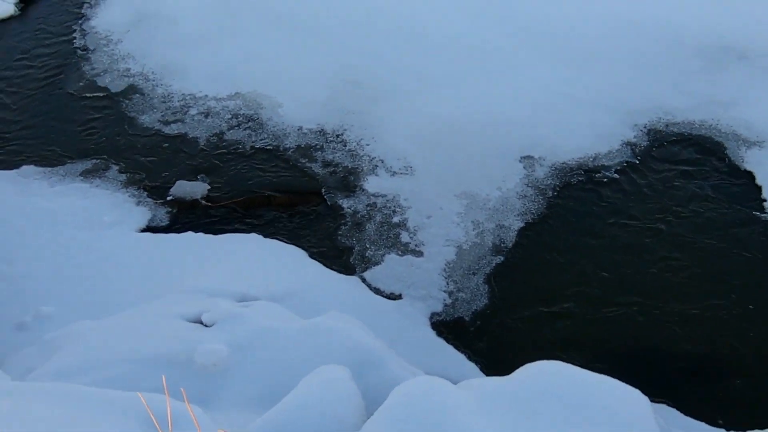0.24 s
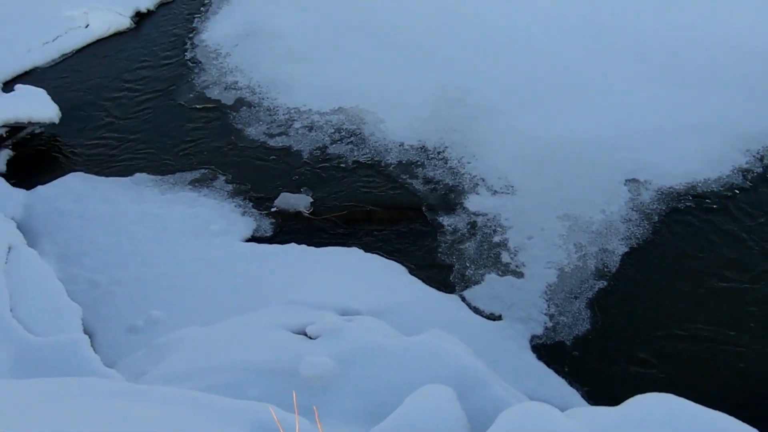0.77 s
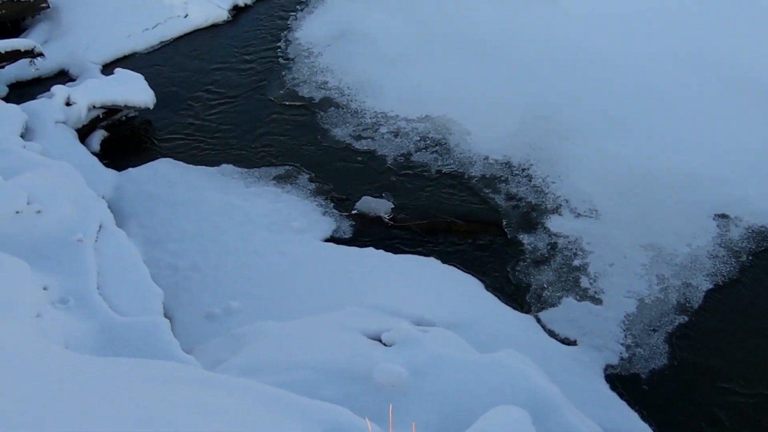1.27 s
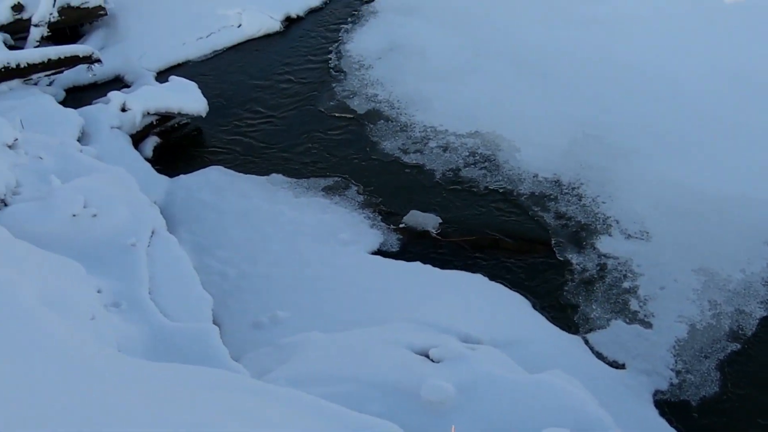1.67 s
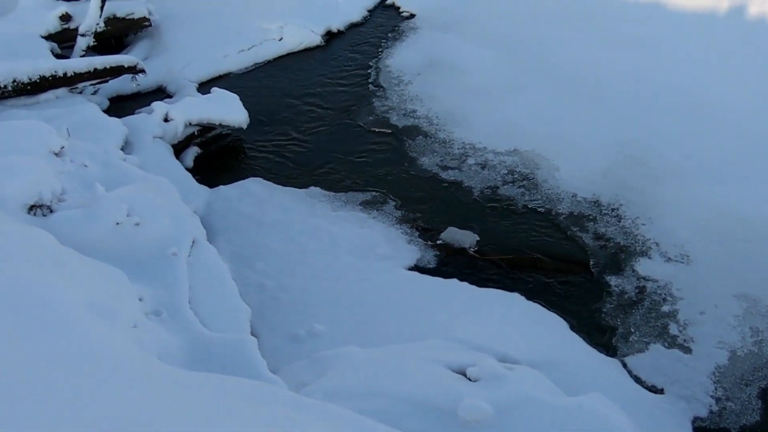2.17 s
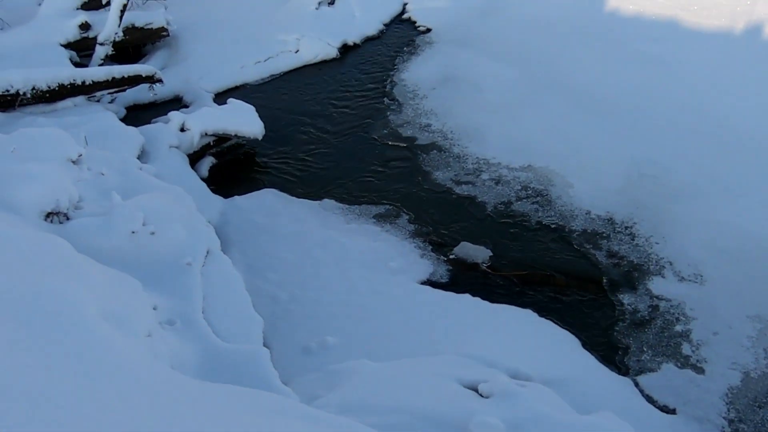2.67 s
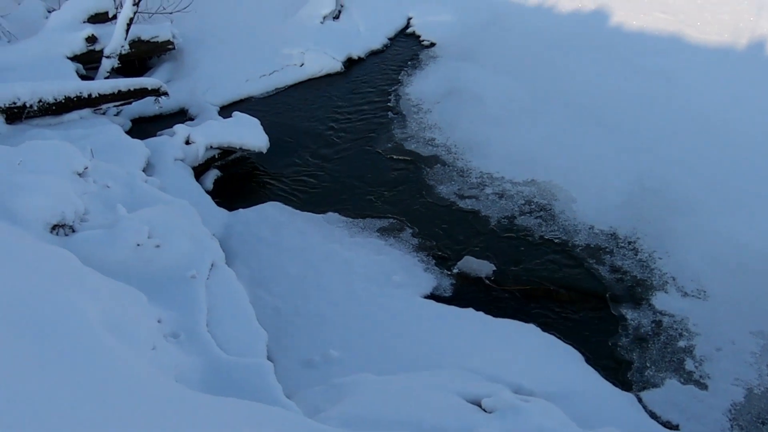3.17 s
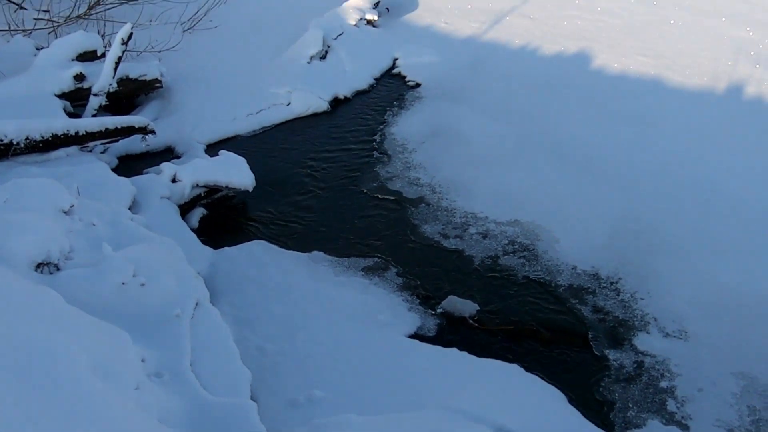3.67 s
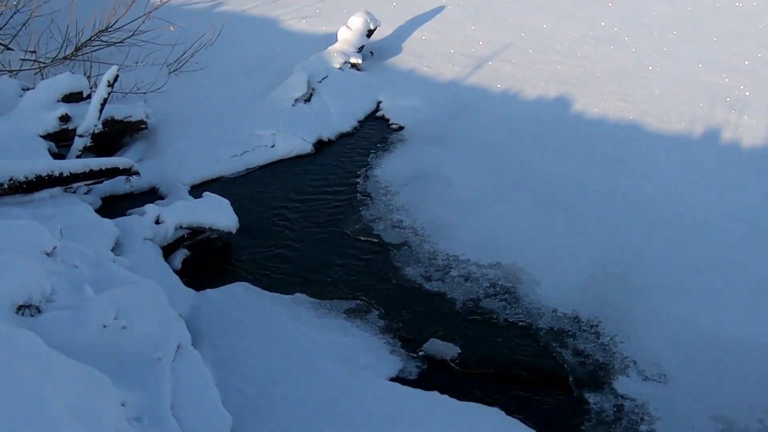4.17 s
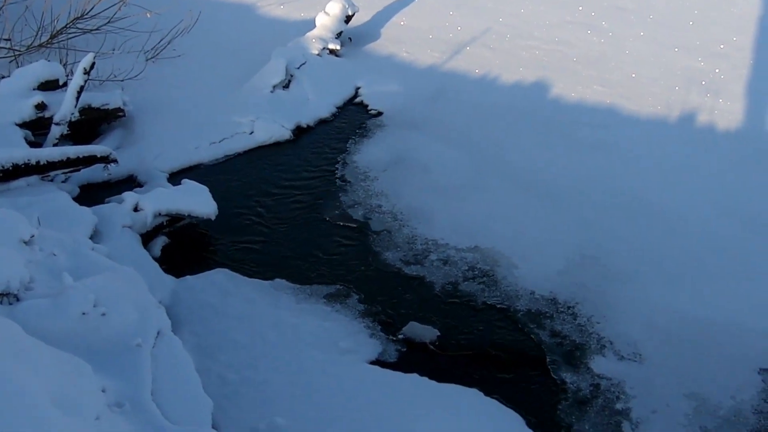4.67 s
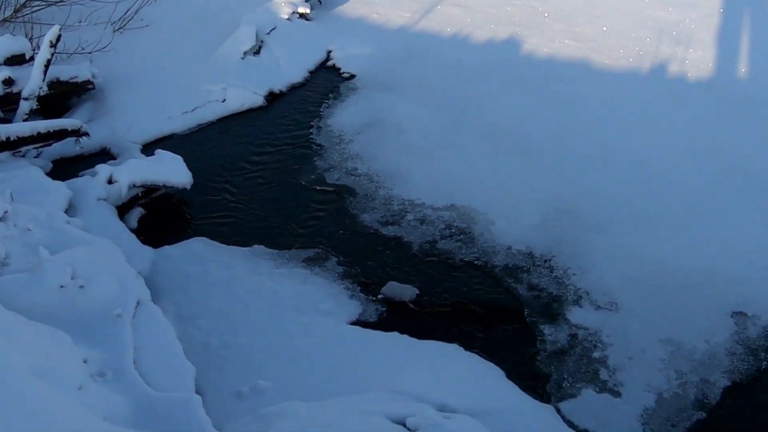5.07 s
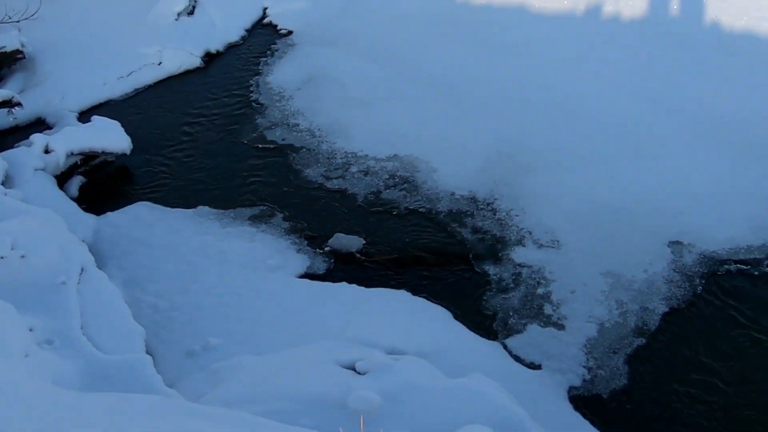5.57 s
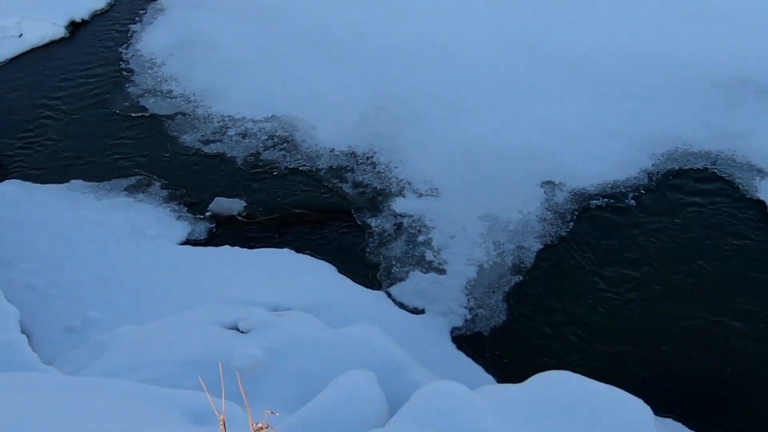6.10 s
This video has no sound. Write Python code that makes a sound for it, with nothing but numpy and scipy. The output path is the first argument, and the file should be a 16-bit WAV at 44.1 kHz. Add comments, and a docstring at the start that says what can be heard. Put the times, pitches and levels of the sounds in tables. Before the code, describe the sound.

A small stream trickles and bubbles softly through a gap in river ice, while low wind rumble comes and goes on the microphone.

```python
"""A small stream runs through a gap in river ice. Trapped air rings as single clear bubbles and as a fizz
of small ones, drops smack down, and the ice echoes them. Behind these lie a thin wash and a faint high
hiss. Wind buffets the two microphone openings with a rumble and thumps, hardest on the left at the end,
and a low rush roughly follows the gusts. The sound sits almost at one point, then opens wide late on."""
import sys
import numpy as np
from scipy import signal
from scipy.fft import rfft, irfft, next_fast_len
from scipy.io import wavfile
from scipy.ndimage import uniform_filter1d

SR = 44100
rng = np.random.default_rng(int(sys.argv[2]) if len(sys.argv) > 2 else 0)


def int16_out(signal):
    """Quantize to a 16-bit WAV file."""
    q = np.round(np.clip(np.atleast_2d(signal).T, -1, 1) * 32767)
    wavfile.write(sys.argv[1], SR, q.astype(np.int16))


N = 279594

# bubbles that stand out (peak time [s], level [dB], pitch [Hz], ring time [ms])
CLEAR_BUBBLES = [(0.037, -60, 3850, 2.6), (0.052, -50.5, 1380, 6.7), (0.21, -48, 553, 4.8),
                 (0.249, -51, 1330, 5.4), (0.308, -51, 1000, 5.1), (0.33, -46.5, 1302, 9.1),
                 (0.343, -48, 3130, 2), (0.391, -53, 2920, 3.3), (0.478, -56, 3260, 3.4),
                 (0.557, -43.5, 1200, 3.2), (0.617, -48.5, 2980, 2.8), (0.798, -45, 960, 5.6),
                 (0.884, -47, 1534, 5.3), (0.885, -50, 2800, 2.3), (0.959, -50, 1250, 2.2),
                 (0.982, -48.5, 2870, 2.6), (1.015, -52, 545, 6.1), (1.053, -53, 2580, 2.5),
                 (1.184, -54.5, 4160, 3), (1.188, -52.5, 1660, 3), (1.249, -50, 1060, 3.3),
                 (1.328, -41.5, 1315, 3), (1.331, -49, 559, 8.3), (1.358, -45, 1880, 7.5),
                 (1.375, -42.5, 1610, 2.7), (1.399, -57, 1030, 2.1), (1.436, -54.5, 2080, 4.8),
                 (1.462, -47.5, 3070, 1.3), (1.469, -58, 2390, 1.8), (1.516, -47, 1390, 3),
                 (1.522, -48, 1034, 3.8), (1.539, -55, 1270, 2.3), (1.587, -46.5, 1590, 4.3),
                 (1.599, -52.5, 1860, 6.7), (1.622, -56, 3000, 7.2), (1.656, -58.5, 5000, 2.4),
                 (1.688, -45, 1670, 2.9), (1.706, -48.5, 880, 3.6), (1.734, -57, 2690, 9.7),
                 (1.773, -49.5, 790, 8.5), (1.888, -50.5, 2400, 1.06), (2.113, -47, 3180, 1.2),
                 (2.166, -53.5, 2130, 2.5), (2.185, -53, 3040, 2.5), (2.199, -46.5, 1250, 6.3),
                 (2.287, -51.5, 4080, 2.3), (2.295, -56.5, 2350, 4), (2.321, -50, 1065, 4.7),
                 (2.342, -51, 2660, 4.3), (2.356, -56.5, 2590, 3.5), (2.411, -52.5, 815, 9.4),
                 (2.446, -51.5, 2850, 5.1), (2.51, -53, 1160, 7), (2.564, -60, 6840, 2.3),
                 (2.639, -48, 1016, 3.3), (2.688, -54.5, 3080, 6.7), (2.745, -50.5, 2940, 1.4),
                 (2.818, -58, 2850, 5.4), (2.876, -53.5, 4580, 1.7), (2.907, -54.5, 1170, 6.6),
                 (2.925, -52, 1310, 2.6), (2.982, -56, 1650, 3.5), (3.049, -54, 2520, 2),
                 (3.058, -54, 2210, 4.4), (3.068, -50.5, 902, 16), (3.086, -55, 1070, 7.9),
                 (3.155, -51, 784, 5.9), (3.171, -61, 2480, 3), (3.186, -55, 1700, 5.8),
                 (3.243, -53.5, 3020, 3.2), (3.255, -54.5, 980, 7.4), (3.272, -53, 1250, 5),
                 (3.281, -54, 1640, 4), (3.353, -43.5, 1390, 5.6), (3.426, -50.5, 775, 9.2),
                 (3.468, -45.5, 2680, 2.4), (3.532, -56.5, 2520, 7.4), (3.571, -54.5, 1440, 5),
                 (3.624, -53.5, 2630, 3.5), (3.646, -46.5, 764, 6.8), (3.681, -44, 1500, 8.1),
                 (3.702, -54, 2280, 2.7), (3.787, -50.5, 4200, 1.6), (3.834, -59, 5750, 1.5),
                 (3.857, -51.5, 4260, 0.7), (3.916, -47, 1237, 7.2), (3.93, -61, 4600, 3.3),
                 (3.978, -64, 6300, 2.4), (4.004, -61, 4300, 3), (4.068, -54.5, 724, 6.3),
                 (4.112, -47, 4700, 0.7), (4.114, -49.5, 1080, 3.1), (4.142, -48.5, 2860, 4.5),
                 (4.191, -52, 1950, 6.6), (4.286, -58.5, 2730, 4.4), (4.504, -57, 3620, 2.4),
                 (4.54, -55.5, 1400, 4), (4.573, -50.5, 1690, 1.6), (4.614, -53.5, 3100, 4.5),
                 (4.664, -55.5, 1310, 6), (4.669, -55.5, 4230, 0.83), (4.73, -59, 720, 6.6),
                 (4.84, -49.5, 2570, 0.73), (4.878, -54.5, 644, 4.3), (4.914, -45.5, 645, 9.4),
                 (4.967, -61, 3930, 5.4), (5.032, -54.5, 2680, 3.2), (5.08, -58.5, 1410, 6),
                 (5.09, -57.5, 3500, 3), (5.111, -56, 3470, 3.5), (5.202, -49.5, 760, 5.4),
                 (5.212, -57, 4070, 1.6), (5.236, -58.5, 2320, 3.3), (5.252, -56, 1430, 3.4),
                 (5.29, -57.5, 4230, 3.5), (5.309, -59, 1610, 5), (5.336, -54, 1930, 5.2),
                 (5.355, -53.5, 1690, 5.3), (5.362, -59, 4500, 2), (5.394, -59, 3120, 3),
                 (5.554, -61.5, 2250, 5), (5.598, -56.5, 1610, 5.1), (5.611, -60, 3860, 2.5),
                 (5.637, -51.5, 3670, 1.9), (5.641, -49, 855, 13.5), (5.662, -56, 1400, 5),
                 (5.712, -59.5, 726, 6), (5.725, -56.5, 6900, 0.91), (5.757, -55.5, 730, 7.2),
                 (5.834, -43, 6040, 1.16), (5.835, -53.5, 1310, 5.8), (5.875, -51.5, 2280, 3.1),
                 (5.893, -58, 4950, 3.1), (6.052, -57.5, 2650, 4.4), (6.135, -50, 3210, 2.4),
                 (6.312, -51, 1140, 2.7)]
# drops that smack water or ice (time [s], treble level [dB], middle range above treble [dB])
DROPS = [(0.306, -52, -3), (0.342, -58, 16), (0.795, -77.5, 25.5), (1.326, -63.5, 25), (1.369, -71, 23),
         (1.465, -53.5, 11.5), (2.113, -50, -13), (2.186, -56, 17.5), (2.544, -50, -26), (2.798, -61.5, -7),
         (2.815, -50, 2), (2.927, -48.5, 4), (3.24, -52, 4), (3.349, -55.5, 7.5), (3.5465, -42.5, -8),
         (3.5662, -49.5, 2), (3.698, -55, 13), (3.788, -42.5, -7.5), (4.038, -52, -14), (4.112, -58.5, 16),
         (4.287, -54.5, 12.5), (4.309, -72, 22), (4.8, -49, -7), (5.638, -49, -3), (5.7115, -50, -14),
         (5.832, -48, -13), (5.838, -67, -1), (5.842, -59, 8), (5.871, -49, -3), (6.012, -49.5, 4),
         (6.0304, -42.5, -5), (6.0652, -48, -5)]
# strength of the flow behind the fizz and the wash (time [s], level [dB])
WATER_FLOW = [(0.0, -64.5), (1.0, -61.5), (1.9, -64.5), (2.3, -60), (2.7, -65), (3.57, -64), (4.3, -65.5),
              (4.7, -62.5), (5.58, -69), (6.34, -64)]
# weighting of the small bubbles (pitch [Hz], gain [dB])
FIZZ_TONE = [(400, 1.5), (960, -2.5), (1430, 0), (2110, -6), (3110, -4), (4300, -21.5), (5400, -18)]
# tone of the far bubbles (frequency [Hz], gain [dB])
WASH_TONE = [(400, -42.5), (600, -7), (770, -4), (1040, -12.5), (1450, -12.5), (2090, -21), (3140, -21),
             (4720, -24), (5600, -53), (11000, -72.5)]
# tone of the larger droplets (frequency [Hz], gain [dB])
DROPLET_TONE = [(700, -8), (1300, 15.5), (2800, 4.5), (4600, -19.5), (7000, -33)]
# gusts of wind (time [s], rumble level [dB], flutter level [dB])
GUSTS = [(0.0, -35.5, -43), (0.14, -45, -47.5), (0.19, -38, -42), (0.33, -44, -54), (0.49, -35.5, -38.5),
         (0.53, -40.5, -53), (0.63, -41.5, -39), (0.71, -37.5, -40), (0.83, -42.5, -51.5),
         (0.94, -34.5, -46.5), (1.02, -46, -56.5), (1.11, -41.5, -60), (1.18, -51, -69.5),
         (1.32, -39, -60.5), (1.52, -34, -52), (1.68, -48, -60), (1.75, -38.5, -64), (1.91, -46, -56.5),
         (1.99, -47.5, -62), (2.22, -52, -60), (2.28, -41.5, -56.5), (2.47, -52, -55.5), (2.98, -51, -54.5),
         (3.18, -50.5, -60), (3.2, -44.5, -65), (3.28, -56.5, -61.5), (3.41, -48, -54), (3.67, -56.5, -63),
         (3.74, -44, -56.5), (3.8, -53.5, -57), (3.87, -42, -53.5), (4.02, -46.5, -53.5), (4.54, -53, -59),
         (4.59, -38.5, -54.5), (4.68, -47.5, -56.5), (4.79, -44.5, -54), (4.82, -50, -53.5),
         (5.01, -46.5, -68.5), (5.32, -59, -61.5), (5.51, -37.5, -60), (5.65, -61.5, -70), (5.91, -53, -66),
         (5.97, -41, -73), (6.0, -50.5, -65), (6.11, -33.5, -55), (6.16, -38, -58.5), (6.29, -27, -34.5),
         (6.34, -44, -43)]
# which side the wind hits harder (time [s], left above right [dB])
WIND_SIDE = [(4.7, 7), (5.36, -3.5), (5.52, 10.5), (5.6, 2.5), (5.9, 2), (5.94, 21), (6.34, 20)]
# tone of the wind's deep rumble (frequency [Hz], gain [dB])
RUMBLE_TONE = [(15, 4), (30, 11.5), (50, 13), (70, 9.5), (95, 1), (125, -0.5), (200, -87.5)]
# tone of the wind's faster flutter (frequency [Hz], gain [dB])
FLUTTER_TONE = [(80, -30), (120, -7.5), (165, -0.5), (230, -10.5), (330, -23.5), (550, -49.5), (900, -97.5)]
# swirls of air that slap the microphone (centre time [s], level [dB], pitch [Hz], width [cycles])
SWIRLS = [(0.201, -32, 138, 1), (0.224, -31.5, 139, 0.76), (0.473, -32.5, 77, 0.052),
          (0.492, -31, 82, 0.78), (0.574, -27.5, 150, 0.97), (0.699, -29.5, 88.4, 1),
          (0.753, -31, 76.4, 0.56), (0.905, -32.5, 165, 0.92), (1.1, -32, 98, 1), (1.275, -34, 106, 0.47),
          (1.327, -35, 188, 0.3), (1.345, -28, 84, 0.45), (1.639, -34.5, 157, 1), (1.745, -27, 104, 0.35),
          (2.293, -33.5, 146, 1), (2.325, -33.5, 154, 1), (2.654, -38, 157, 1), (2.819, -42.5, 282, 0.78),
          (2.934, -36.5, 176, 0.54), (3.186, -40.5, 211, 1), (3.886, -36.5, 150, 0.67),
          (3.97, -29.5, 176, 0.59), (4.249, -40.5, 129, 0.27), (4.593, -32.5, 135, 0.35),
          (4.613, -39.5, 89, 0.53), (4.784, -44, 69.5, 0.43), (5.0, -34, 71, 0.2), (5.034, -30, 129, 0.3),
          (5.514, -35, 94.4, 0.62), (5.962, -27.5, 92.5, 0.66), (6.102, -24.5, 115, 0.28),
          (6.182, -33.5, 127, 0.45), (6.209, -27.5, 89, 0.9), (6.234, -29, 125, 0.11),
          (6.283, -26, 78, 0.3)]
# swell of the low rush (time [s], level [dB])
RUSH_LEVEL = [(0.0, -62), (1.0, -58.5), (1.31, -67), (1.64, -64.5), (1.78, -66), (2.03, -69.5),
              (2.21, -63.5), (2.49, -64), (3.12, -70), (3.8, -66), (3.95, -62), (4.34, -68), (4.8, -65),
              (5.65, -74.5), (6.16, -70), (6.34, -54)]
# tone of the low rush (frequency [Hz], gain [dB])
RUSH_TONE = [(200, -25.5), (300, 3.5), (420, -1.5), (560, -6.5), (700, -16.5), (900, -55)]
# level of the high hiss (time [s], level [dB])
HISS_LEVEL = [(0.0, -101), (1.0, -88.5), (1.5, -94.5), (2.2, -83.5), (2.9, -77.5), (3.2, -87.5),
              (3.8, -83.5), (5.5, -87), (5.85, -81), (6.34, -84.5)]
# tone of the high hiss (frequency [Hz], gain [dB])
HISS_TONE = [(4300, -49), (5200, -2.5), (6100, 2), (7500, 1), (10100, -2.5), (11000, -13), (16000, -33.5)]
# how alike left and right are in the wash, rush and hiss (frequency [Hz], likeness [0 to 1])
LIKENESS = [(60, 0.27), (220, 1), (810, 0.94), (2970, 0.98), (10900, 0.24)]
# cut in the left-right difference while the sound is narrow (frequency [Hz], gain [dB])
NARROWING = [(60, -97), (340, -41), (1080, -33), (3430, -22), (6110, -7.5), (10900, -8)]


def bubble(hz, seconds, glide, wobble, rise=.48):
    """Trapped air swells, rings and slides in pitch, beating with a neighbour. Gives rise time, sound."""
    age = np.arange(0, 4, 1 / (seconds * SR))  # counted in ring times
    fade = np.exp(-(abs(age - rise) / .62) ** 1.4)
    shape = np.where(age < rise, np.sin(np.pi / 2 * age / rise) ** 2, fade)
    beat = 1 + 0.3 * np.minimum(age, 1) * np.exp(2j * np.pi * wobble * (age + 1))
    turns = hz * seconds * (age + glide * (age ** 2 / 2 - 0.74 * age))
    return rise * seconds, shape * beat * np.exp(2j * np.pi * turns)


def clear_bubbles(followers=3, splash_db=-12, follower_db=-12):
    """Each bubble pinches off with a soft splash and rings unevenly; a few fainter ones follow."""
    out, t = np.zeros((2, N)), np.arange(600) / SR
    draws = rng.standard_normal((len(CLEAR_BUBBLES), 24 + 3 * followers))
    for (s, db, hz, ms), chance in zip(CLEAR_BUBBLES, draws):
        across, (glide, wobble), bumps, trail = np.split(chance, [2, 4, 24])
        seconds = max(ms / 1000, 5 / hz)
        lead, ring = bubble(hz, seconds, .02 + .04 * glide, 1.2 * wobble)
        uneven = np.interp(np.linspace(-1, 9, len(ring)), np.arange(10), bumps[:10] + 1j * bumps[10:])
        ring *= 1 + 0.5 * uneven * np.minimum(np.linspace(0, 6, len(ring)), 1)
        add(out, s - lead, gain_of(db) * placed(ring / abs(ring).max(), 0.2 * across))
        band = signal.butter(5, [hz / 2, max(4200, 1.3 * hz)], "band", fs=SR, output="sos")
        splash = signal.sosfilt(band, rng.standard_normal(len(t)) * t * np.exp(-t / 0.0014))
        add(out, s - lead, gain_of(db + splash_db) * np.array([splash, splash]) / abs(splash).max())
        for late, pitch, strength in trail.reshape(followers, -1):
            faint = bubble(hz * np.exp(0.15 * pitch), min(seconds, 9 / hz), .03 * late, strength)[1]
            start = s + seconds / 2 + 0.008 * abs(late)
            add(out, start, gain_of(db + follower_db + 3 * strength) * placed(faint, 0.3 * across))
    return out


def drops(treble_decay_s=0.0008, middle_decay_s=0.0025):
    """A drop smacks water or ice: a tiny burst of noise whose treble dies first."""
    out, t = np.zeros((2, N)), np.arange(600) / SR
    treble_band = signal.butter(3, [3670, 8340], "band", fs=SR, output="sos")
    middle_band = signal.butter(3, [1170, 2750], "band", fs=SR, output="sos")
    for (s, db, middle_db), noise in zip(DROPS, rng.standard_normal((len(DROPS), 3, len(t)))):
        burst = (noise[0] + 0.8 * noise[1:]) * np.minimum(t / 0.0006, 1)
        treble = signal.sosfilt(treble_band, burst * np.exp(-t / treble_decay_s))
        middle = signal.sosfilt(middle_band, burst * np.exp(-t / middle_decay_s))
        add(out, s, gain_of(db) * (treble / np.ptp(treble) + gain_of(middle_db) * middle / np.ptp(middle)))
    return out


def fizz(per_s=340, spread_db=6.0, pitches=120):
    """Many small bubbles of all sizes ring in loose clusters; a few are strong."""
    flow_db = curves(WATER_FLOW)[0]
    busy = gain_of(7.0 * drift(.03)[0] + 3.6 * drift(0.06)[0])
    strength = gain_of(flow_db + spread_db * np.minimum(rng.exponential(1, N), 2.0))
    strength *= rng.random(N) < per_s / SR * busy / busy.mean()
    kind, out = rng.integers(0, pitches, N), np.zeros((2, N))
    for k, hz in enumerate(np.geomspace(420, 5400, pitches)):
        cycles = rng.uniform(6, 16)
        across, (glide, wobble) = rng.standard_normal((2, 2))
        ring = bubble(hz, cycles / hz, .03 * glide, 1.2 * wobble)[1]
        ring *= gain_of(at_pitch(FIZZ_TONE, hz)) * hz / np.sqrt(cycles)
        ring = placed(ring, 1.53 * across)
        for at in np.flatnonzero(strength * (kind == k)):
            add(out, at / SR, strength[at] * ring)
    return gain_of(flow_db.mean() + 0.1) * out / out.std()


def ice_echoes(sound, fade_s=.06, gap_samples=90):
    """Ice edges and snow banks throw back short, scattered echoes."""
    t = np.arange(gap_samples, 4000) / SR
    echoes = rng.choice([-1., 1.], (2, len(t))) * (rng.random((2, len(t))) < .04)
    echoes *= gain_of(-60 * t / fade_s)
    echoes /= np.linalg.norm(echoes, axis=1, keepdims=True)
    return signal.fftconvolve(sound, np.pad(echoes, ((0, 0), (gap_samples, 0))), axes=1)[:, :N]


def wash():
    """Countless far bubbles merge into noise that laps in spurts, with small splashes in it."""
    noise = patchy(WASH_TONE, patch_db=3.0, flicker_db=3.0, bands=6, flicker_s=0.018)
    splashes = ticks(DROPLET_TONE, per_s=110, db=-10, decay_s=0.0013)
    return gain_of(curves(WATER_FLOW)[0] - 4.0) * (noise + splashes)


def ticks(tone, per_s, db, decay_s, spread_db=0.0):
    """Droplets land at random without ringing, each a soft-edged tick."""
    hits = gain_of(spread_db * np.minimum(rng.exponential(1, N), 2.2)) * (rng.random(N) < per_s / SR)
    noise, decay = rng.standard_normal((3, N)), np.exp(-1 / (decay_s * SR))
    shape = signal.lfilter([1], [1, -2 * decay, decay ** 2], hits)  # each hit swells, then fades
    return gain_of(db) * evened(coloured(shape * (noise[0] + 1.9 * noise[1:]), tone))


def wind():
    """Rough air shakes each microphone opening on its own: a deep rumble and a jumpier flutter."""
    rumble_db, flutter_db = curves(GUSTS)
    rumble = evened(coloured(rng.standard_normal((2, N)), RUMBLE_TONE) * gain_of(2.0 * drift(0.062)))
    flutter = evened(coloured(rng.standard_normal((2, N)), FLUTTER_TONE) * gain_of(3.82 * drift(0.013)))
    return pan(curves(WIND_SIDE)[0]) * (gain_of(rumble_db) * rumble + gain_of(flutter_db) * flutter)


def thumps(kink_db=-10.5):
    """A swirl of air pushes and pulls the microphone's thin skin, with a sharper kink halfway."""
    out = np.zeros((2, N))
    for (s, db, hz, width), phase in zip(SWIRLS, rng.uniform(0, 2 * np.pi, len(SWIRLS))):
        turns = np.arange(-2, 2, hz / SR)
        swing = np.sin(2 * np.pi * turns * (1 - 0.031 * turns) + phase)
        swing *= np.exp(-.5 * (turns / width) ** 2)
        kink = np.exp(-.5 * (turns / 0.12) ** 2) * np.sin(2 * np.pi * 1.1 * turns + phase)
        thump = (swing + gain_of(kink_db) * kink) * np.hanning(len(turns))
        sides = pan(curves(WIND_SIDE, s)[0])
        add(out, s - 2 / hz, gain_of(db) * np.outer(2 * sides / sides.sum(), thump))
    return out


def low_rush():
    """A low rushing noise swells and sinks, roughly with the gusts."""
    noise = patchy(RUSH_TONE, patch_db=4.0, flicker_db=2.5, bands=8, flicker_s=0.038)
    return gain_of(curves(RUSH_LEVEL)[0]) * noise


def high_hiss():
    """A faint high hiss, dotted with ticks; the high treble flickers on and off."""
    hiss = patchy(HISS_TONE, patch_db=4.5, flicker_db=3.5, bands=9, flicker_s=0.026)
    level = gain_of(curves(HISS_LEVEL)[0] + 1.8 * drift(.07)[0])
    return level * (hiss + ticks(HISS_TONE, per_s=150, db=-8, decay_s=0.0007))


def patchy(tone, patch_db, flicker_db, bands, flicker_s):
    """Noise with loud patches drifting in time and pitch, and short lulls shared by all pitches."""
    frames, hz = N // 128 + 5, np.fft.rfftfreq(512, 1 / SR)
    a, b, c, d, patches = rng.standard_normal((frames, 257, 5)).T
    patches = uniform_filter1d(uniform_filter1d(patches, bands, 0), 10, 1)
    alike = np.clip(at_pitch(LIKENESS, hz), -1, 1)[:, None]
    left = a + 1j * b
    right = alike * left + np.sqrt(1 - alike ** 2) * (c + 1j * d)
    level = gain_of(at_pitch(tone, hz)[:, None] + patch_db * patches / patches.std())
    noise = signal.istft(np.array([left, right]) * level, nperseg=512, noverlap=384)[1][:, :N]
    return evened(noise * gain_of(flicker_db * np.tanh(20.0 * drift(flicker_s)[0] + 1.0)))


def drift(seconds):
    """A slow random wander for each side."""
    size = round(seconds * SR)
    return evened(uniform_filter1d(uniform_filter1d(rng.standard_normal((2, N)), size), size))


def placed(sound, across):
    """A source off to one side reaches left and right with a different level and phase."""
    side = (across[0] + 1j * across[1]) * sound
    return np.array([sound + side, sound - side]).imag


def pan(left_db):
    """Left and right gains whose powers add up to 4."""
    ratio = gain_of(left_db)
    return 2 * np.array([ratio, np.ones_like(ratio)]) / np.sqrt(1 + ratio ** 2)


def coloured(x, tone):
    """Turn each frequency up or down as a tone table says."""
    size = next_fast_len(N)
    return irfft(rfft(x, size) * gain_of(at_pitch(tone, np.fft.rfftfreq(size, 1 / SR))), size)[..., :N]


def at_pitch(table, hz):
    """Look up a table by frequency."""
    known_hz, value = np.transpose(table)
    return np.interp(np.log(hz + 1), np.log(known_hz + 1), value)


def curves(table, t=np.arange(N) / SR):
    """Look up a table by time, one curve per column."""
    s, *columns = np.transpose(table)
    return [np.interp(t, s, column) for column in columns]


def gain_of(db):
    """Turn decibels into a multiplier."""
    return 10 ** (np.asarray(db) / 20)


def evened(x):
    """Scale to an average power of 1."""
    return x / np.sqrt(np.mean(x ** 2, axis=-1, keepdims=True) + 1e-20)


def add(mix, s, sound):
    """Mix a sound in, starting at s seconds."""
    part = mix[:, max(round(s * SR), 0):][:, :sound.shape[1]]
    part += sound[:, :part.shape[1]]


def scene(echo_db=-9):
    """The stream and its echoes, with the low rush, the high hiss and the wind."""
    near = clear_bubbles() + drops() + fizz()
    stream = near + gain_of(echo_db) * ice_echoes(near) + wash()
    return stream + low_rush() + high_hiss() + wind() + thumps()


def record(dry, opens_s=4.7, top_hz=11500):
    """The sound is narrow, most of all in the bass, until it opens wide; the top treble is cut off."""
    mid, side = (dry[0] + dry[1]) / 2, (dry[0] - dry[1]) / 2
    wide = np.clip((np.arange(N) / SR - opens_s) / .08, 0, 1)
    side = wide * side + (1 - wide) * coloured(side * (1 - wide), NARROWING)
    out = np.pad([mid + side, mid - side], ((0, 0), (255, 255)), "reflect")
    treble_cut = signal.firwin(511, top_hz, window=("kaiser", 9), fs=SR)
    return signal.oaconvolve(out, treble_cut[None], "valid")


dry = scene()
out = record(dry)
int16_out(out)
```